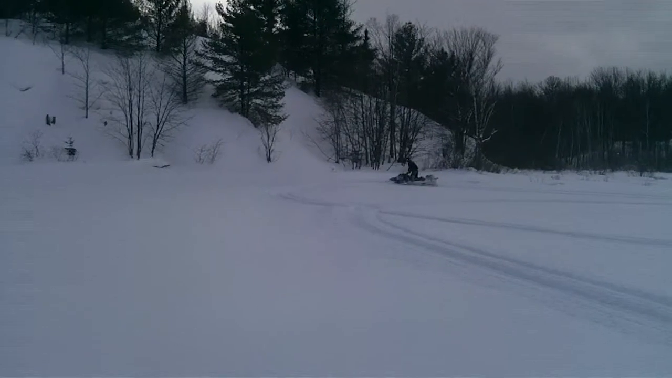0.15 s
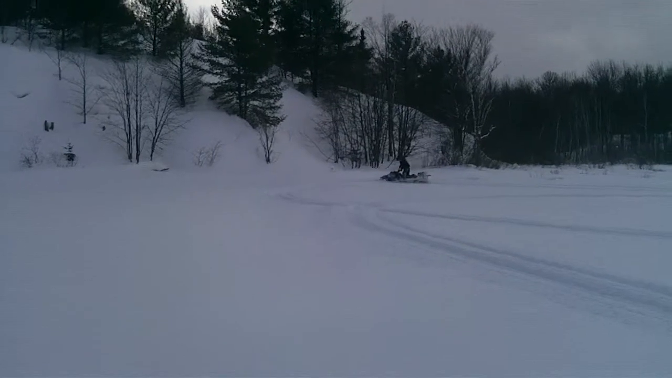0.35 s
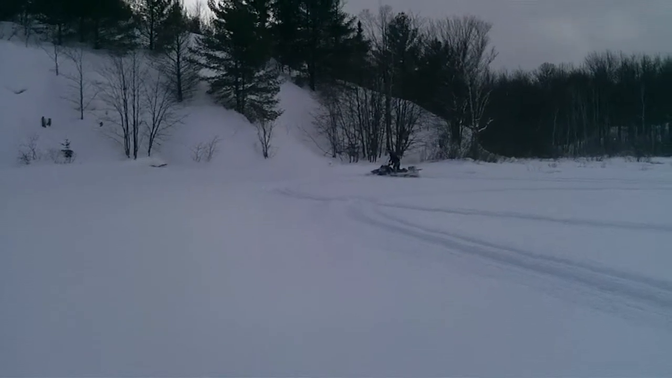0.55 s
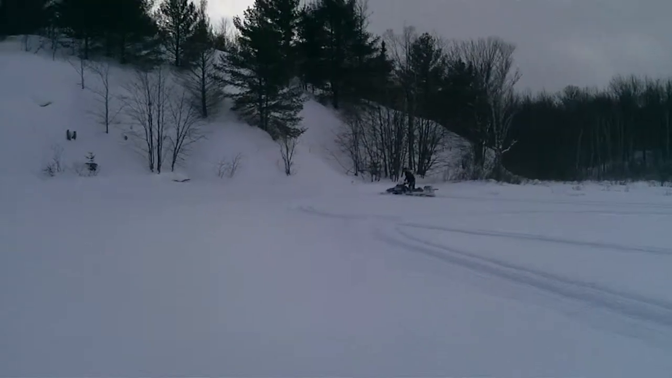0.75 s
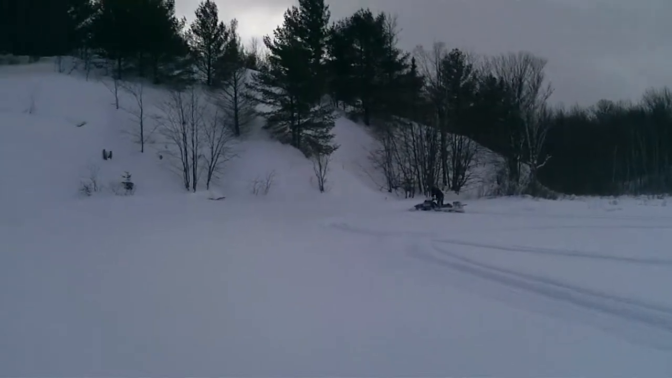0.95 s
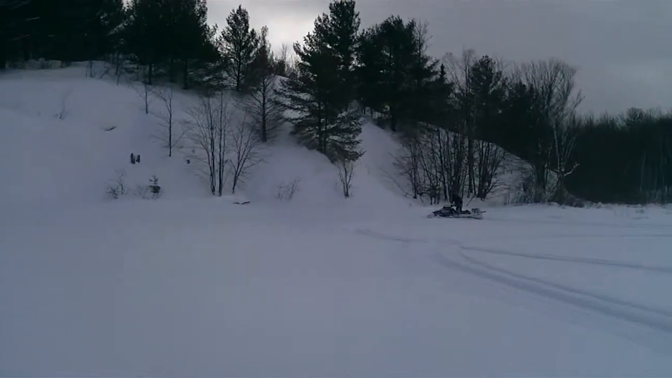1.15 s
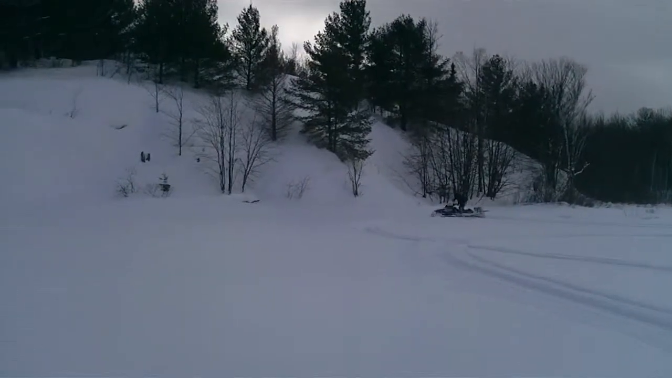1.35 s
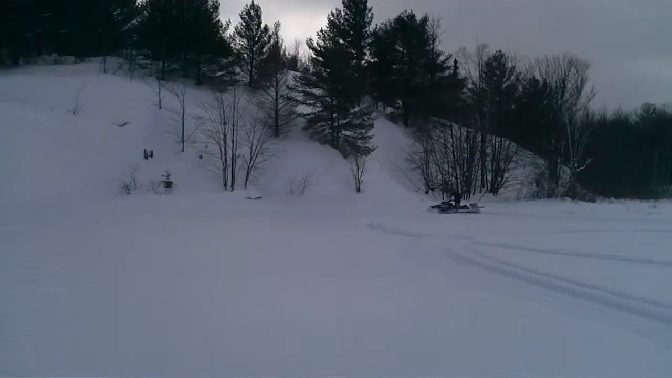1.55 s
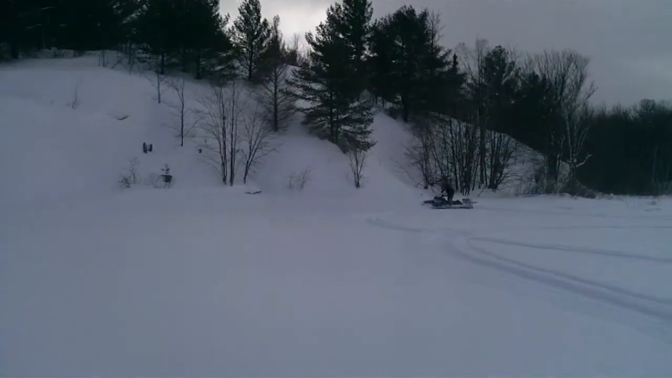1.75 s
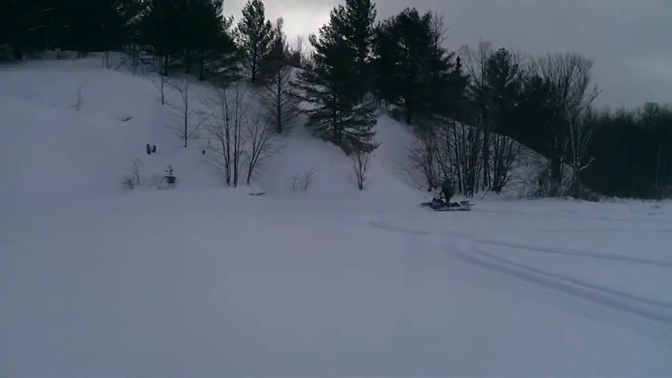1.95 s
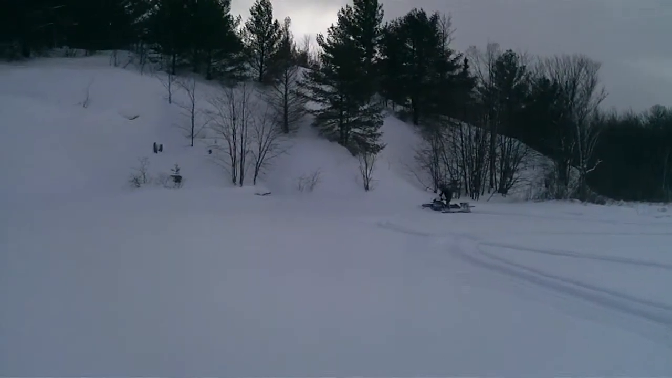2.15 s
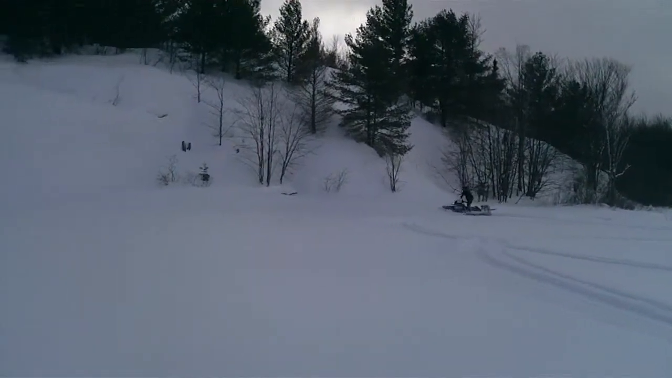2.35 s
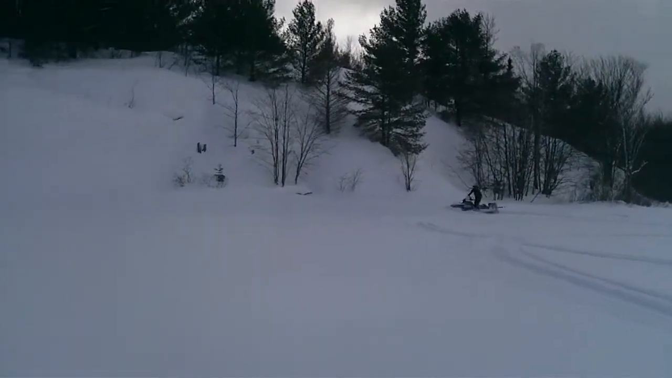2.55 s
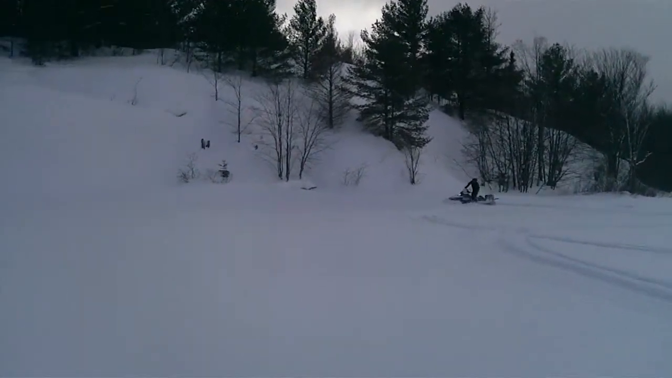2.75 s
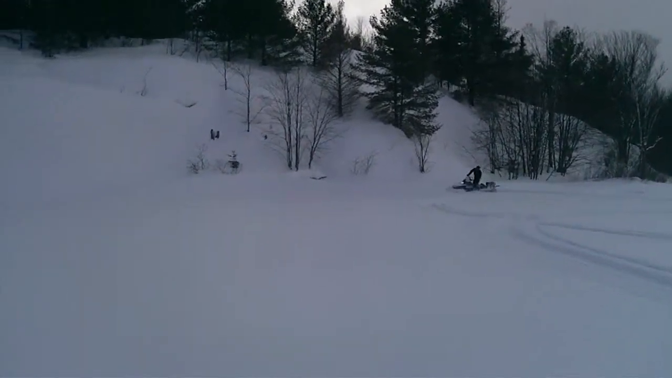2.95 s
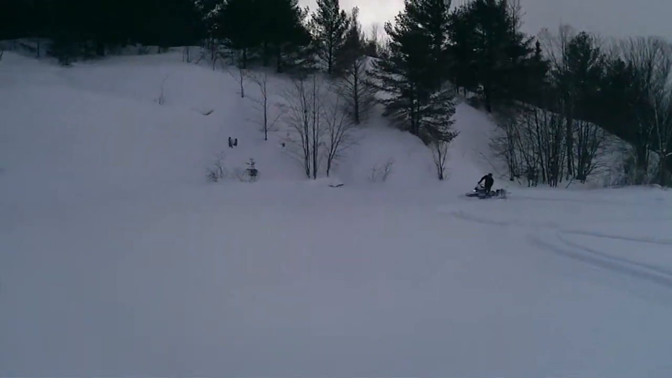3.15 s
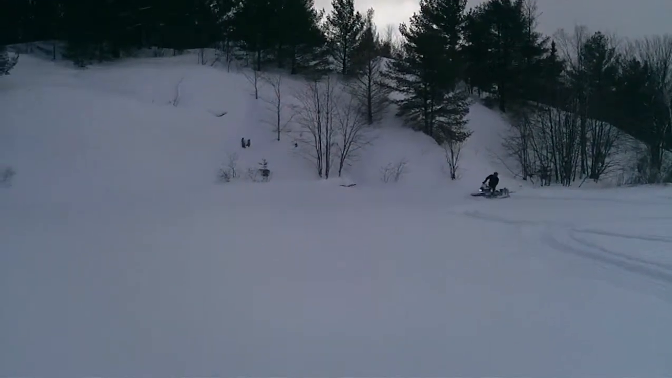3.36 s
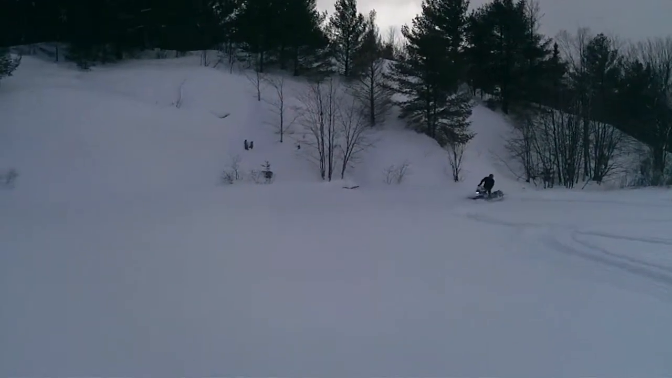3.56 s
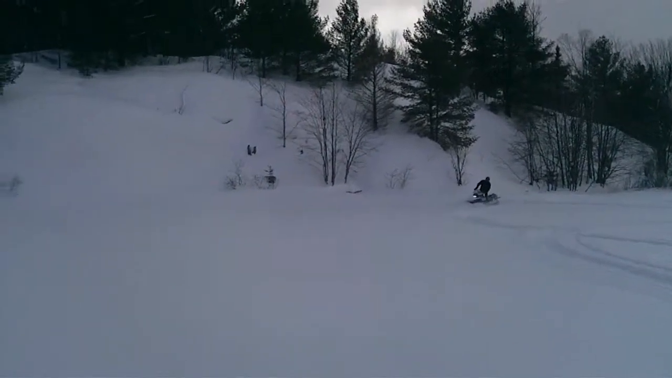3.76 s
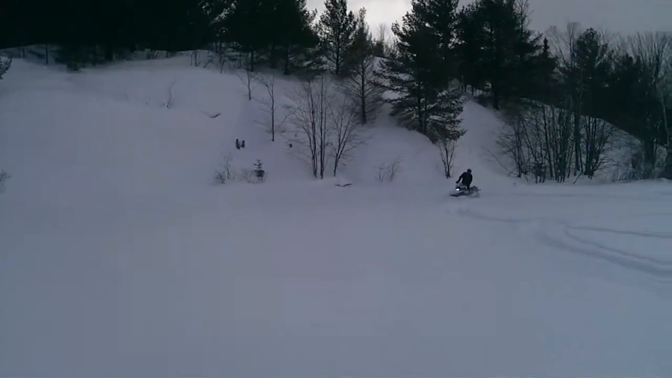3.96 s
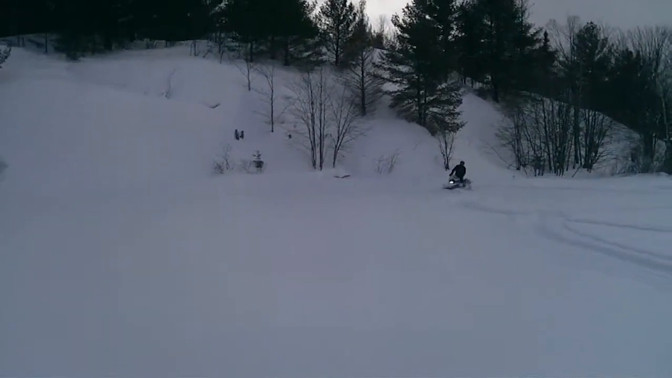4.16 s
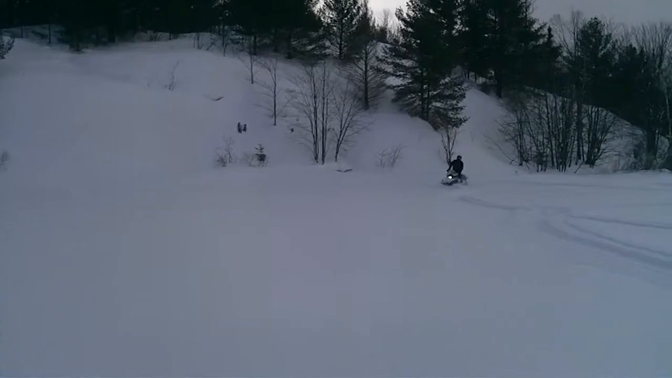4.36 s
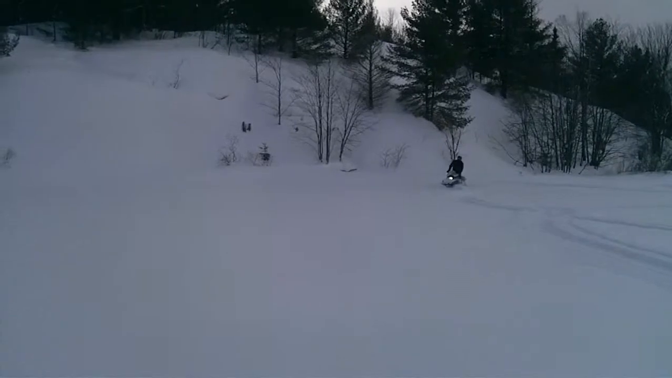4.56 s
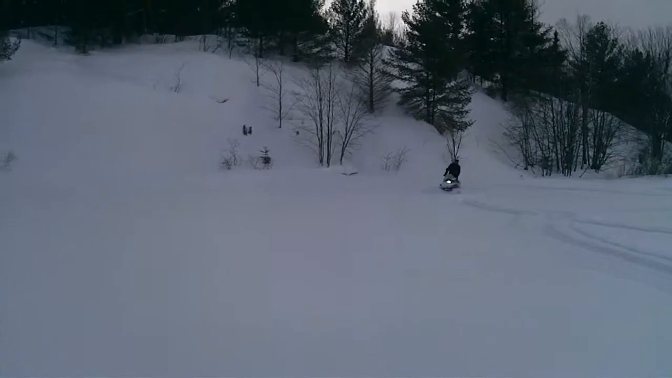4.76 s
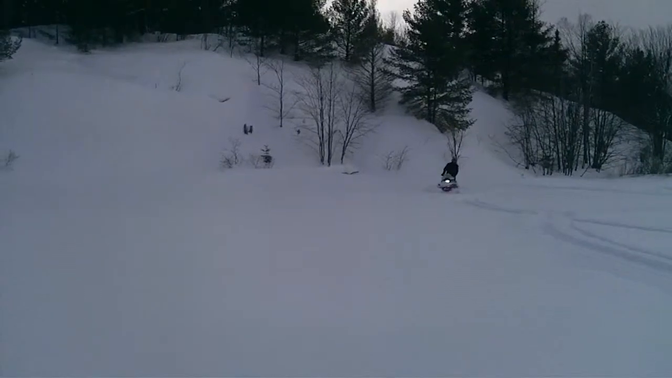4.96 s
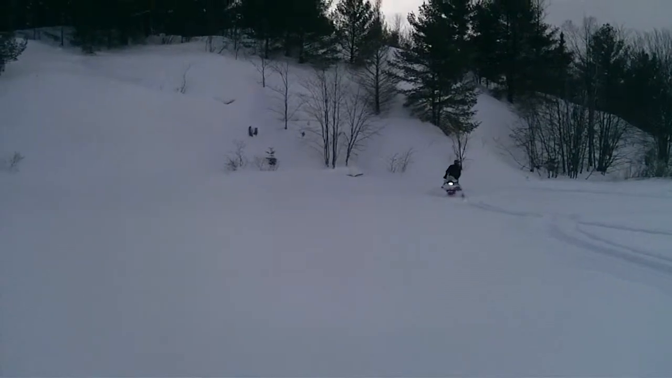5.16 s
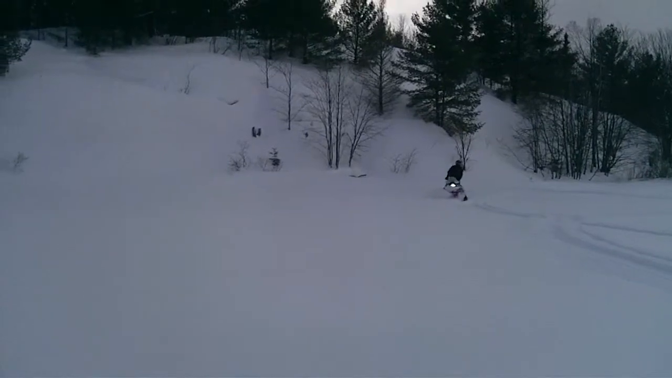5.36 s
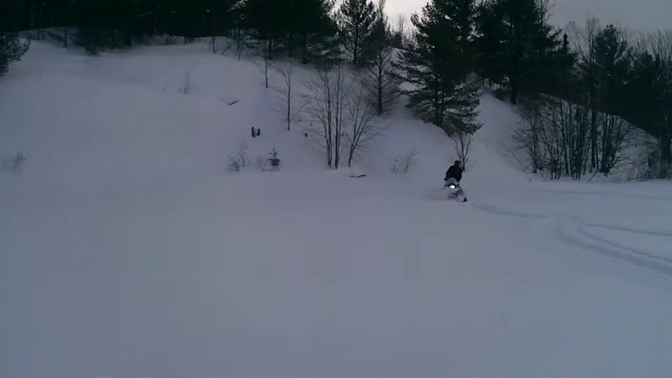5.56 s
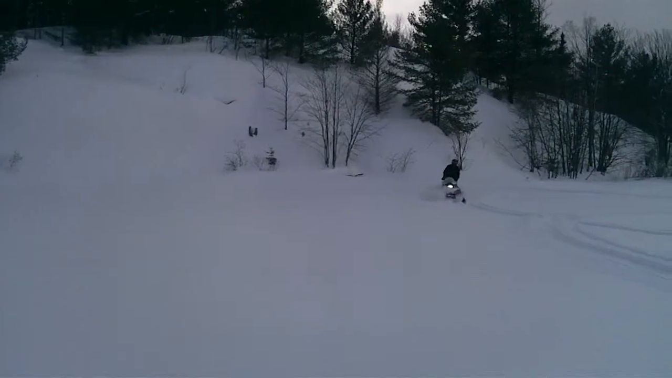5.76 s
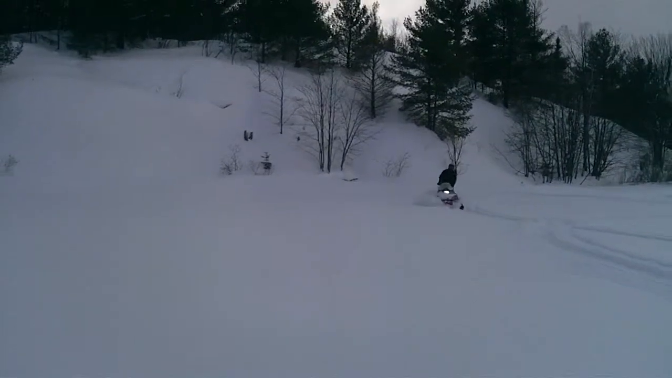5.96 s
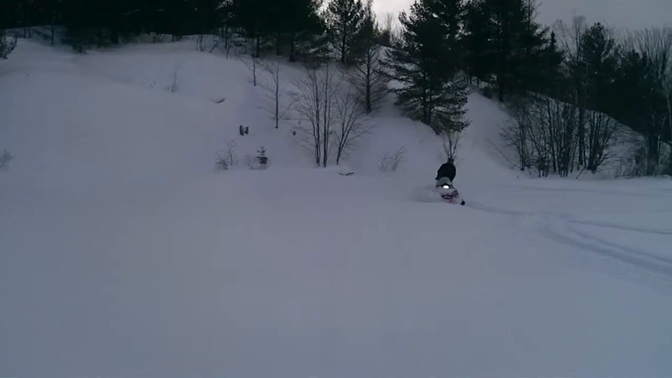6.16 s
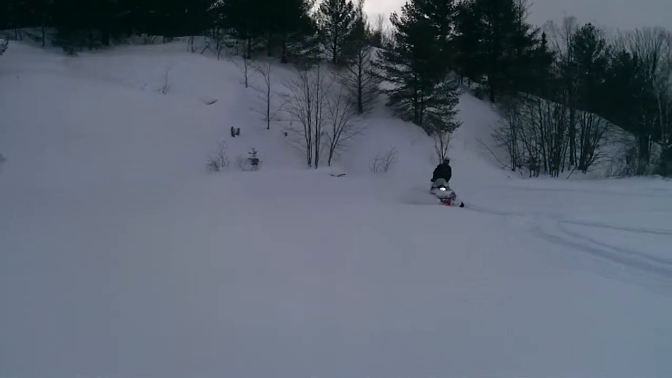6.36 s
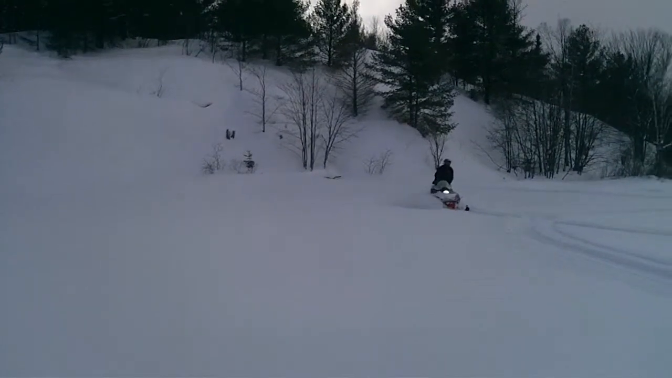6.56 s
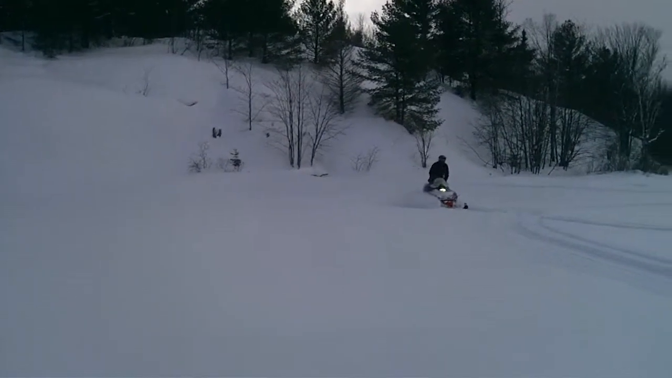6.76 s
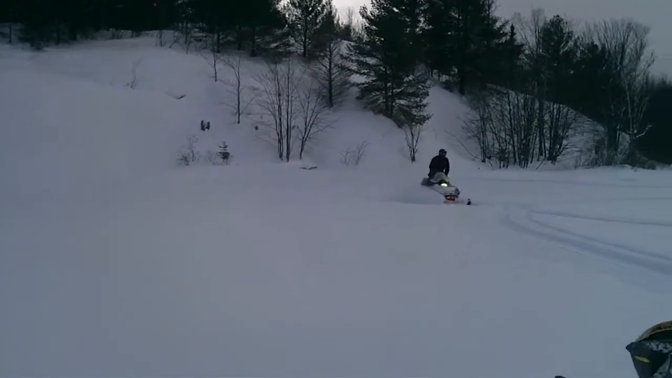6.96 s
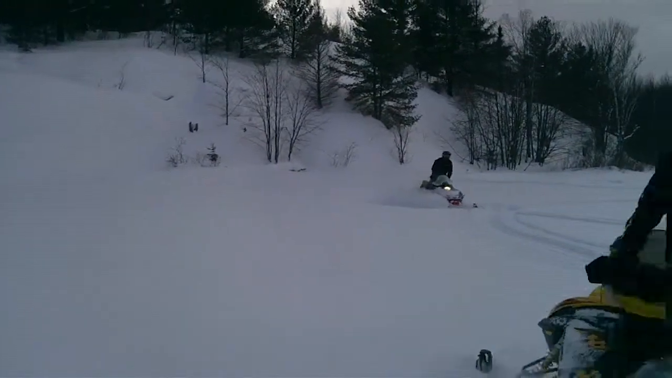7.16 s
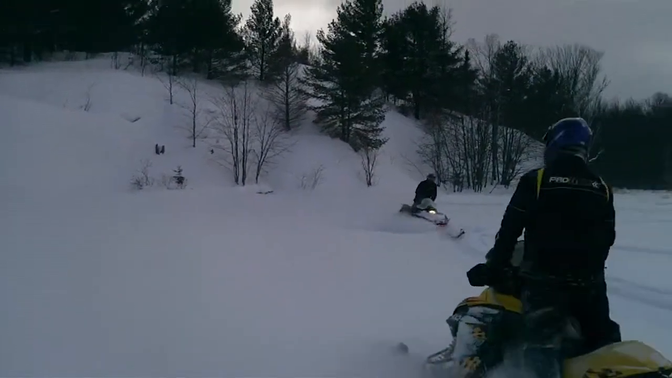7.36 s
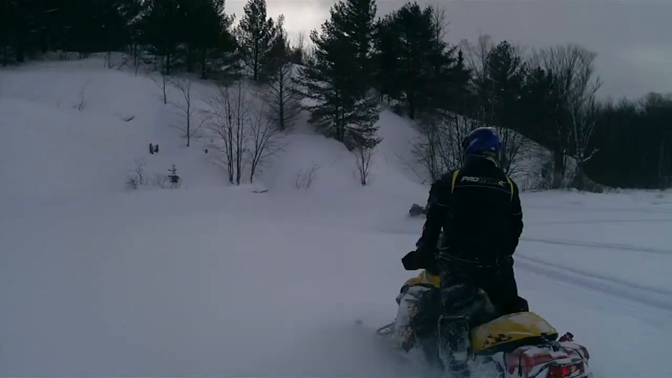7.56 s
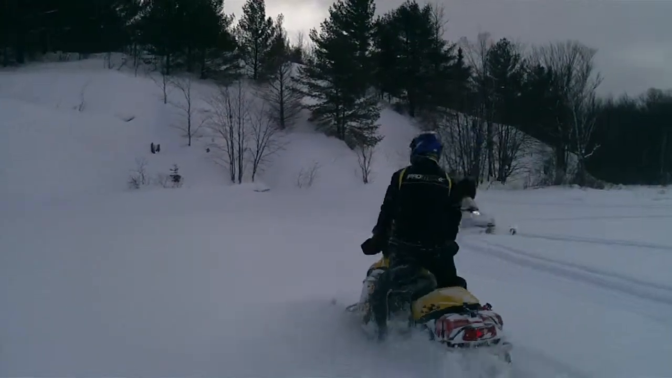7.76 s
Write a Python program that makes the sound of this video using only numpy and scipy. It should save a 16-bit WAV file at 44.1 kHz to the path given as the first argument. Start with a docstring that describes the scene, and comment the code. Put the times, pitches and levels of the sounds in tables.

```python
"""Snowmobile idling, then pulling away

A twin-cylinder two-stroke idles close by, then revs in surges: crank orders and clatter ring cowl and panels.
Low tones at the firing rate make the exhaust drone; noise makes upper hiss, wind, gusts, shuffles and rustles.
Damped sines make microphone bumps and nearby knocks; a preamplifier adds hiss and whistle, then clips.
Sound is on the left only. Source levels are ahead of the x2 preamplifier gain."""
import sys
import numpy as np
from scipy import signal
from scipy.io import wavfile
from scipy.ndimage import uniform_filter1d

SR = 44100
rng = np.random.default_rng(int(sys.argv[2]) if len(sys.argv) > 2 else 0)


def put_to_file(sound):
    """Save the sound as 16-bit audio at rate SR, in the file named by the first command-line argument."""
    columns = np.atleast_2d(sound).T  # one column per channel
    safe = np.clip(columns, -1, 1)
    whole_steps = np.round(safe * 32767)
    wavfile.write(sys.argv[1], SR, whole_steps.astype(np.int16))


N = 344901

# crankshaft, before smoothing; steady idle, then surges as the track grips and slips: time_s, speed_rev_per_s
CRANK_SPEED = [(0, 46.2), (.85, 46), (1.1, 45.5), (2, 45.1), (4.93, 44.7), (5.13, 63.5), (5.24, 65.2),
               (5.37, 76.2), (5.45, 79.4), (5.53, 76.4), (5.67, 76.3), (5.85, 80.5), (6.047, 96.8),
               (6.12, 91.3), (6.19, 88.3), (6.38, 95.9), (6.53, 92.9), (6.61, 94.6), (6.79, 105),
               (6.94, 93.2), (7.15, 100.3), (7.33, 93.6), (7.4, 94.4), (7.585, 102.5), (7.72, 90.8),
               (7.82, 88.6)]
# engine roar: time_s, level_db
ROAR_LEVEL = [(0, -32), (.3, -30.5), (.9, -32), (1.4, -32), (2.9, -33), (3.05, -31), (3.2, -32.5),
              (4.66, -32), (4.96, -30), (5.1, -23.5), (5.23, -23.5), (5.36, -18.5), (5.6, -20.5),
              (5.81, -18.5), (5.93, -12.5), (6.03, -11.5), (6.12, -13.5), (6.27, -11), (6.6, -10.5),
              (6.72, -6), (6.88, -8), (6.96, -7.5), (7.05, -8), (7.23, -12.5), (7.55, -12), (7.62, -14.5),
              (7.82, -19)]
# engine state: time_s, repeating_power_share (0-1), load (0-1), tail_on (0-1)
ENGINE_STATE = [(0, .2, 0, 0), (4.9, .2, 0, 0), (5.3, .35, .6, 0), (5.8, .55, .8, 0), (6.0, .68, 1, 0),
                (6.75, .76, 1, 0), (7.05, .76, 1, 1), (7.58, .72, 1, 1), (7.7, .5, 1, 1)]
# broad engine and microphone colour, idling: freq_hz, gain_db
IDLE_COLOUR = [(250, -32), (450, -38), (620, -22.5), (800, -13), (1150, -13.5), (1400, -3), (1700, -0.5),
               (1950, -1), (2350, -10), (2750, -4), (3260, -19), (3530, -26.5), (4530, -37), (7000, -44)]
# the same under load: freq_hz, gain_db
LOAD_COLOUR = [(250, -41.5), (450, -36), (620, -36.5), (820, -23.5), (1130, -25.5), (1400, -10.5),
               (1700, 1), (1950, -4), (2400, -14.5), (2650, -12), (3250, -24.5), (3500, -22.5),
               (4400, -32.5), (7000, -50)]
# ringing panels, peaks re broad colour: freq_hz, width_hz, idle_db, loaded_db, tail_on_db
PANEL_RINGS = [(825, 13, 10.5, 8, 3), (866, 170, -32, 6, 4.5), (1019, 123, -20, 10.5, 4),
               (1257, 30, 15.5, 9, -20), (1226, 61, 8, 17, 9.5), (1196, 36, -2, -16, 11.5),
               (1606, 63, 4.5, -38, 7), (1801.4, 66, 4, 6, 4.5), (2557, 46, 5, 5, 7.5),
               (2696, 97, -3, 1, -16), (3524, 55, 11, -9, 12)]
# exhaust drone: time_s, firing_tone_db, octave_db
DRONE_LEVEL = [(0, -46, -57.5), (1.1, -48, -55.5), (4.92, -47.5, -53.5), (5.02, -40, -55), (5.14, -44, -55),
               (5.23, -41, -50), (5.36, -33, -38), (5.44, -38.5, -50.5), (5.62, -37.5, -41.5),
               (5.8, -37.5, -48), (5.96, -42, -46), (6.2, -43.5, -53), (6.4, -45, -56), (6.55, -50, -56),
               (6.93, -51, -54), (7.0, -44, -62), (7.15, -52, -57), (7.35, -48.5, -54), (7.6, -53, -60),
               (7.72, -57, -65), (7.82, -46, -55)]
# upper hiss level: time_s, level_db
UPPER_HISS_LEVEL = [(0, -47.5), (4.75, -46.5), (5.0, -45), (5.2, -39), (5.5, -36), (5.8, -36.5),
                    (5.95, -30.5), (6.6, -28), (6.9, -27), (7.4, -31.5), (7.82, -37)]
# upper hiss spectrum: freq_hz, relative_db_per_hz
UPPER_HISS_SPECTRUM = [(300, -46), (800, -19.5), (2750, 5), (3250, -2.5), (3650, 4.5), (4200, -3.5),
                       (4600, -8), (6000, -18.5), (10000, -24.5), (16000, -27)]
# wind spectrum: freq_hz, relative_db_per_hz
WIND_SPECTRUM = [(10, -35), (18, -15.5), (45, 0.5), (90, -0.5), (140, -2), (200, -12.5), (300, -12),
                 (450, -18), (800, -43.5)]
# gusts over the steady wind: start_s, hold_s, level_db
GUST_EVENTS = [(.32, .04, -54), (.97, .04, -46), (2.55, 0.11, -49.5), (3.76, 0.031, -56),
               (5.17, .03, -37.5), (5.31, 0.019, -53), (5.46, 0.19, -45), (6.6, 0.037, -44),
               (6.9, .06, -45)]
# electronic noise spectrum: freq_hz, relative_db_per_hz
HISS_SPECTRUM = [(200, 3), (4000, 6), (9000, -4.5), (16000, -12)]
# electrical tone: freq_hz, level_db
WHISTLE_TONE = [(7881, -64)]
# low shuffling nearby: start_s, hold_s, level_db
SHUFFLE_EVENTS = [(.22, 0.29, -60), (.97, .08, -52), (1.17, 0.41, -54.5), (1.85, .33, -51),
                  (2.26, 0.63, -51.5), (2.95, 0.13, -47.5), (3.17, 0.43, -61), (3.66, 0.05, -50.5),
                  (3.9, 0.29, -56.5), (4.29, .27, -52.5), (4.7, .06, -66), (5.0, 0.7, -51.5)]
# shuffling spectrum: freq_hz, relative_db_per_hz
SHUFFLE_SPECTRUM = [(200, -38.5), (380, -2), (500, -2), (700, 1), (1000, -5), (2000, -65)]
# hand bumps on the microphone, level before decay: start_s, level_db, nominal_hz
BUMP_EVENTS = [(.33, -30, 25), (.963, -23, 110), (1.016, -24, 54.5), (2.849, -38, 22)]
# knocks and ticks nearby, ring level before attack and decay:
# start_s, ring_db, ring_hz, ring_t60_s, snap_peak_db, snap_hz
KNOCK_EVENTS = [(.964, -18.5, 390, 0.01, -31, 1100), (2.767, -40, 5000, .006, -38, 5000),
                (3.685, -40, 5900, .006, -23, 2930), (4.285, -38, 705, .04, -36, 750),
                (4.34, -27.5, 676, 0.037, -30, 900), (4.485, -36, 670, .04, -30, 800),
                (4.72, -29, 640, 0.037, -25, 850), (4.734, -38.5, 474, 0.073, -43, 600)]
# airy rustles close by: start_s, hold_s, level_db
RUSTLE_EVENTS = [(3.0, 0.063, -39.5), (4.89, 0.047, -37.5)]
# rustle spectrum: freq_hz, relative_db_per_hz
RUSTLE_SPECTRUM = [(400, -24), (800, -14), (2300, 10), (3500, 2), (4600, -11), (6300, -13), (7200, -22),
                   (12000, -30)]

FLYWHEEL_S = .04  # speed smoothing window
# weak drone tones: idling, loaded, tail-on
THIRD_DB, CRANK_DB = (-59.5, -53.5, -61), (-66, -48.5, -59.5)
UPPER_HISS_SWING_DB, UPPER_HISS_SWING_HZ = 0.37, 22
WIND_DB, WIND_SWING_DB, WIND_SWING_HZ = -49, 1, 4
HISS_DB = -66.5
SWELL_S, DYING_S = 0.035, 0.018  # burst fades; the swell precedes start_s
PREAMP_GAIN, CLIP_LEVEL, EDGE_HZ = 2, .98, 15800


def amp(db):
    """Amplitude factor of a level in dB."""
    return 10 ** (np.asarray(db) / 20)


def evened(x):
    """Scales x to rms 1."""
    return x / np.sqrt(np.mean(x ** 2) + 1e-20)


def curves(rows):
    """Interpolates each table column after time_s to one value per sample."""
    time_s, *columns = np.transpose(rows)
    return [np.interp(np.arange(N) / SR, time_s, column) for column in columns]


def coloured(x, points, rings=()):
    """Minimum-phase filter: a (Hz, dB) spectrum with (Hz, width_hz, dB) resonances added in power."""
    hz, db = np.transpose(points)
    f = np.fft.rfftfreq(16384, 1 / SR)
    power = np.ones(len(f))
    for centre_hz, width_hz, peak_db in rings:
        power += amp(2 * peak_db) / (1 + (2 * (f - centre_hz) / width_hz) ** 2) ** 2
    broad_db = np.interp(np.log(f + 1), np.log(hz), db)
    half = np.log(amp(broad_db) * np.sqrt(power))
    log_gain = np.maximum(np.r_[half, half[-2:0:-1]], -11)
    # Hilbert transform of log gain gives the causal phase
    taps = np.fft.ifft(np.exp(np.conj(signal.hilbert(log_gain)))).real
    return signal.oaconvolve(x, taps[:8000])[:N]


def ring(x, hz, width_hz):
    """Second-order resonance, gain 1 at its peak."""
    return signal.lfilter(*signal.iirpeak(hz, hz / width_hz, SR), x)


def wander(hz):
    """Random drift, low-passed near hz, rms 1."""
    steps = rng.standard_normal(N // 64 + 2)
    steps = signal.filtfilt(*signal.butter(2, hz, fs=SR / 64), steps)
    return evened(np.interp(np.arange(N) / 64, np.arange(len(steps)), steps))


def noise(points, level_db, flicker_db, flicker_hz):
    """Coloured noise at a level, flickering at random."""
    grain = evened(coloured(rng.standard_normal(N), points))
    return amp(level_db + flicker_db * wander(flicker_hz)) * grain


def bursts(rows):
    """Level in dB of events that swell, hold and die away."""
    t = np.arange(N) / SR
    gain = np.zeros(N)
    for start_s, hold_s, db in rows:
        corners_s = np.cumsum([start_s - SWELL_S, SWELL_S, hold_s, DYING_S])
        gain += amp(db) * np.interp(t, corners_s, [0, 1, 1, 0])
    return 20 * np.log10(gain + 1e-6)


def add(mix, start_s, sound):
    """Adds sound into mix in place, cut at the end."""
    part = mix[round(start_s * SR):][:len(sound)]
    part += sound[:len(part)]


def crank_turns():
    """Crank angle in turns: speed smoothed by the flywheel, with slight random drift."""
    speed = uniform_filter1d(curves(CRANK_SPEED)[0], round(FLYWHEEL_S * SR))
    return np.cumsum(speed * (1 + .0015 * wander(15))) / SR


def crank_orders(turns):
    """Orders 7-41 of the crank: blows spread over the turn, so phases are unrelated and levels drift."""
    speed = np.gradient(turns) * SR
    orders = np.zeros(N)
    for k in range(7, 42):
        high = np.clip((k * speed - 1250) / 500, 0, 1)  # high orders are less exact
        db = (2.5 + 0.8 * high) * wander(15) - 2.5 * high
        orders += amp(db) * np.cos(2 * np.pi * k * turns + 2 * np.pi * rng.random())
    # fewer orders per Hz at speed: match the clatter's power per Hz
    return orders * np.sqrt(4 * speed / SR)


def stroke_clatter(turns):
    """White noise puffing with the strokes, rms 1."""
    cycle = 2 * np.pi * turns
    puffs_db = 1.2 * np.cos(cycle) + 0.68 * np.cos(2 * cycle) + 2.3 * np.cos(3 * cycle)
    puffs = amp(puffs_db + 0.24 * wander(38))
    return evened(puffs * rng.standard_normal(N))


def roar(turns):
    """Repeating crank orders and clatter drive cowl and panels, cross-faded by load and tail angle."""
    repeating, load, tail = curves(ENGINE_STATE)
    orders = crank_orders(turns)
    clatter = stroke_clatter(turns)
    source = np.sqrt(repeating) * orders + np.sqrt(1 - repeating) * clatter
    drive = amp(curves(ROAR_LEVEL)[0]) * source
    states = [(1 - load, IDLE_COLOUR), (load * (1 - tail), LOAD_COLOUR), (load * tail, LOAD_COLOUR)]
    out = np.zeros(N)
    for k, (share, colour) in enumerate(states):
        rings = [(row[0], row[1], row[2 + k]) for row in PANEL_RINGS]
        filter_rms = np.std(coloured(clatter[:SR], colour, rings))
        out += share * coloured(drive, colour, rings) / filter_rms
    return out


def drone(turns):
    """Exhaust: firing rate (two per turn) and two harmonics, plus weak crank orders 1, 3 and 5."""
    _, load, tail = curves(ENGINE_STATE)
    shares = [1 - load, load * (1 - tail), load * tail]
    third_db, crank_db = np.array([THIRD_DB, CRANK_DB]) @ shares
    out = np.zeros(N)
    for k, db in enumerate([*curves(DRONE_LEVEL), third_db]):
        out += amp(db + 0.94 * wander(24)) * np.cos(2 * np.pi * 2 * (k + 1) * turns)
    for order, db in [(1, 0), (3, -5.0), (5, -6.0)]:
        out += amp(crank_db + db + 2.0 * wander(10)) * np.cos(2 * np.pi * order * turns)
    return np.sqrt(2) * out  # levels are rms


def upper_hiss():
    """Flickering upper hiss, faint at idle and stronger as the engine revs."""
    level_db = curves(UPPER_HISS_LEVEL)[0] + UPPER_HISS_SWING_DB * wander(UPPER_HISS_SWING_HZ)
    return noise(UPPER_HISS_SPECTRUM, level_db, 1.5, 46)


def wind():
    """Low rumbling noise, swinging slowly, with stronger gusts."""
    steady = noise(WIND_SPECTRUM, WIND_DB + WIND_SWING_DB * wander(WIND_SWING_HZ), 0.76, 7)
    gusts = noise(WIND_SPECTRUM, bursts(GUST_EVENTS), 1.6, 9.7)
    return steady + gusts


def electronics():
    """Input noise and a steady electrical whistle."""
    hz, db = WHISTLE_TONE[0]
    whistle = np.sqrt(2) * amp(db) * np.sin(2 * np.pi * hz * np.arange(N) / SR)
    return noise(HISS_SPECTRUM, HISS_DB, .5, 30) + whistle


def shuffles():
    """Low shuffling: bursts of flickering noise."""
    return noise(SHUFFLE_SPECTRUM, bursts(SHUFFLE_EVENTS), 1.5, 30)


def bumps():
    """A push on the membrane and its slower return: a damped sine falling in pitch."""
    out = np.zeros(N)
    for start_s, db, hz in BUMP_EVENTS:
        u = np.arange(0, 3, hz / SR)
        add(out, start_s, amp(db) * np.sin(2 * np.pi * u ** 0.46) * np.exp(-1.6 * u))
    return out


def knocks():
    """Short damped rings, each opened by a wide noise snap."""
    out, t = np.zeros(N), np.arange(3000) / SR
    for start_s, db, hz, t60_s, snap_db, snap_hz in KNOCK_EVENTS:
        snap = rng.standard_normal(len(t)) * amp(-60 * t * np.sqrt(snap_hz) / .6)
        for relative_width in (1.1, 1.5, 1.5):
            snap = ring(snap, snap_hz, relative_width * snap_hz)
        attack = np.minimum(t / (0.076 * t60_s), 1)
        body = np.sin(2 * np.pi * hz * t) * amp(-60 * t / t60_s) * attack
        add(out, start_s, amp(db) * body + amp(snap_db) * snap / abs(snap).max())
    return out


def rustles():
    """Airy rustles: brief bursts of fast-flickering noise."""
    return noise(RUSTLE_SPECTRUM, bursts(RUSTLE_EVENTS), 1.8, 80)


def scene():
    """Sums all sources on the left; the right is silent."""
    turns = crank_turns()
    engine = roar(turns) + drone(turns)
    nearby = shuffles() + bumps() + knocks() + rustles()
    return np.array([engine + upper_hiss() + wind() + nearby, np.zeros(N)])


def record(dry):
    """Left: electronics, gain, hard clipping, low-pass at EDGE_HZ; right: dead input."""
    left = PREAMP_GAIN * (dry[0] + electronics())
    left = np.clip(left, -CLIP_LEVEL, CLIP_LEVEL)
    lowpass = signal.firwin(511, EDGE_HZ, window=("kaiser", 9), fs=SR)
    left = signal.oaconvolve(left, lowpass, "same")
    return np.array([left, dry[1]])


dry = scene()
out = record(dry)
put_to_file(out)
```